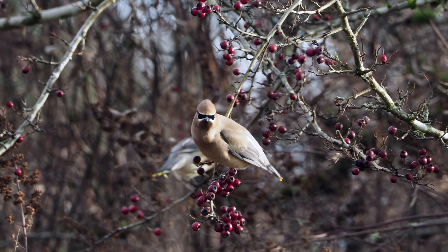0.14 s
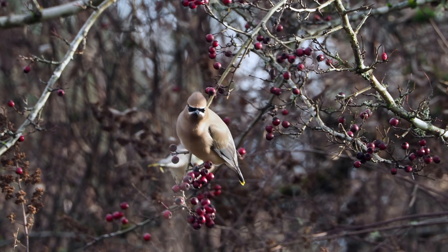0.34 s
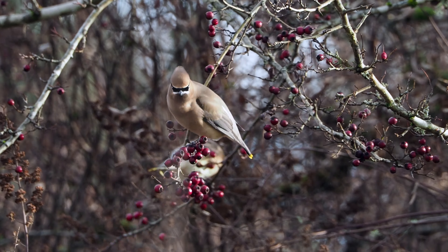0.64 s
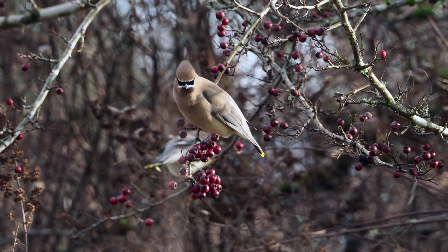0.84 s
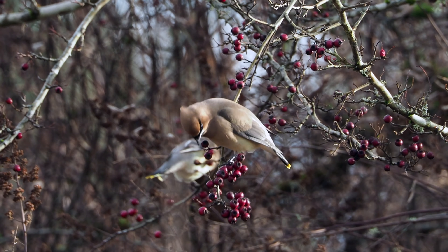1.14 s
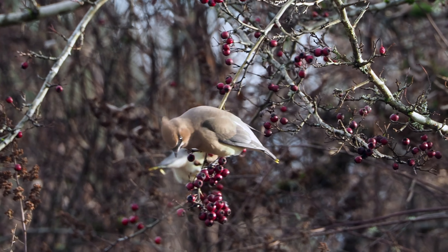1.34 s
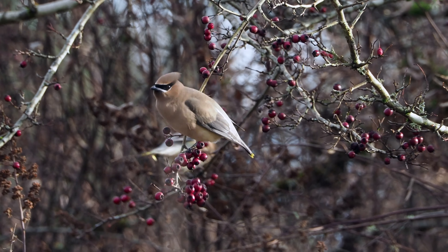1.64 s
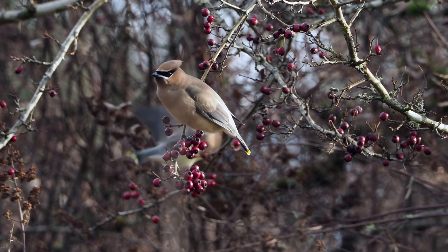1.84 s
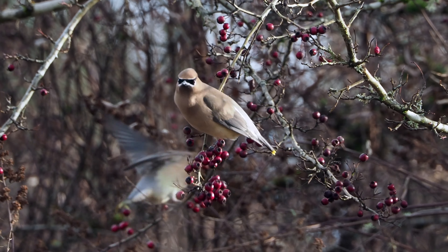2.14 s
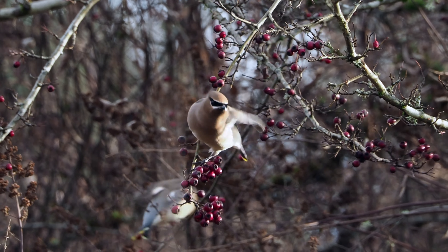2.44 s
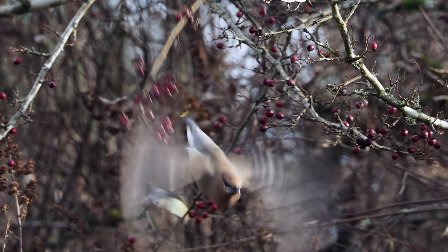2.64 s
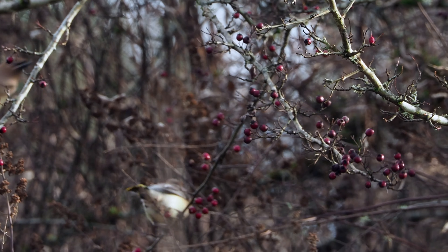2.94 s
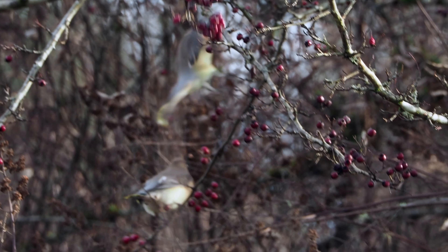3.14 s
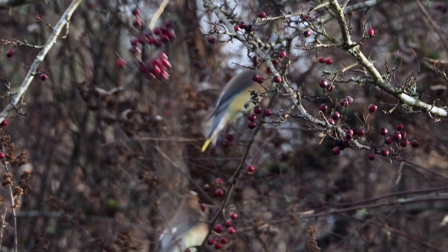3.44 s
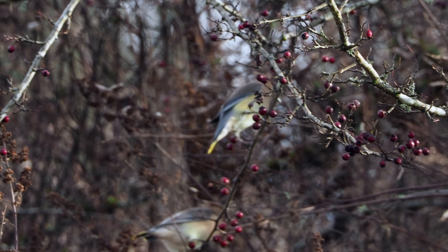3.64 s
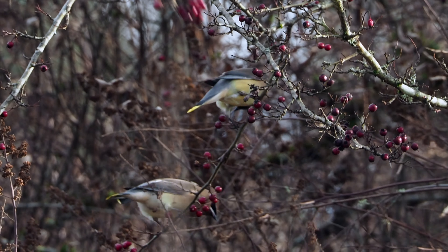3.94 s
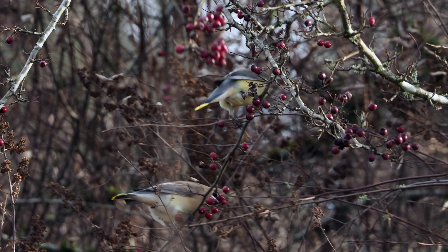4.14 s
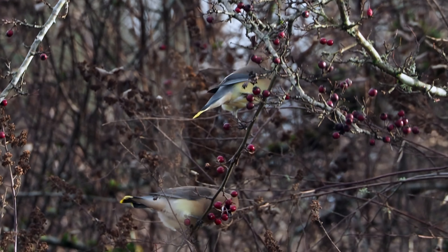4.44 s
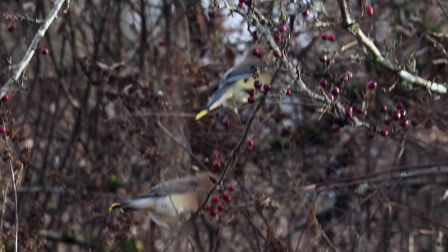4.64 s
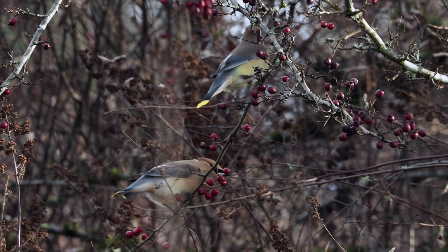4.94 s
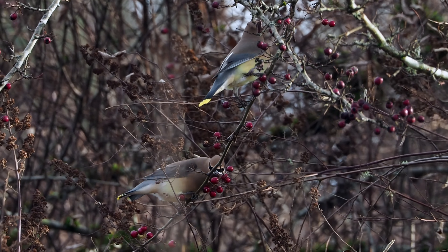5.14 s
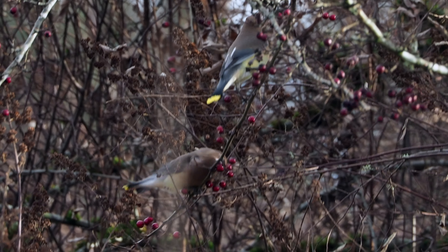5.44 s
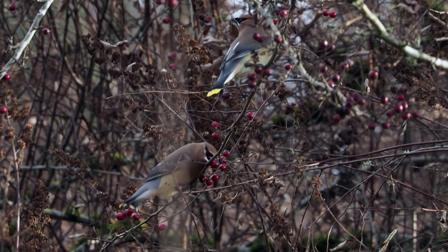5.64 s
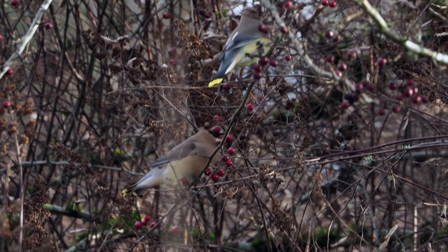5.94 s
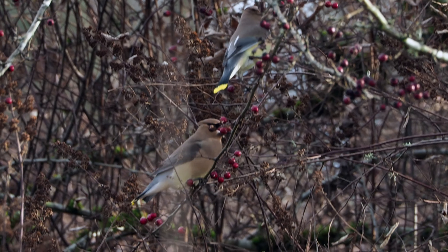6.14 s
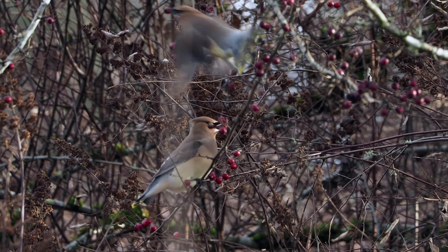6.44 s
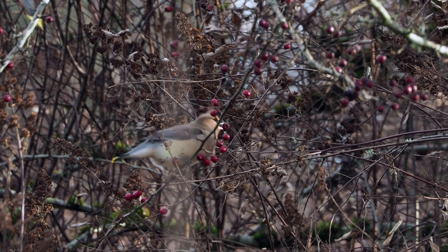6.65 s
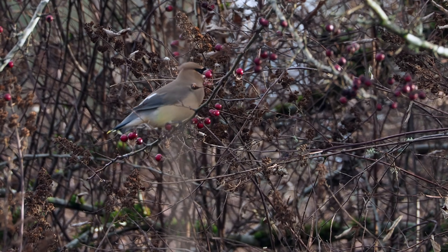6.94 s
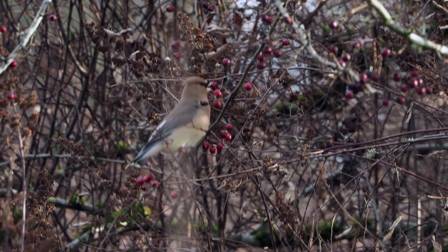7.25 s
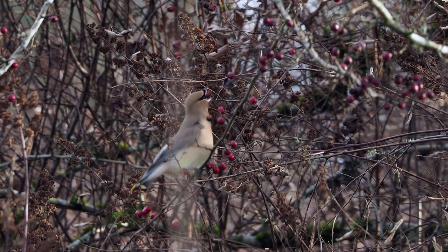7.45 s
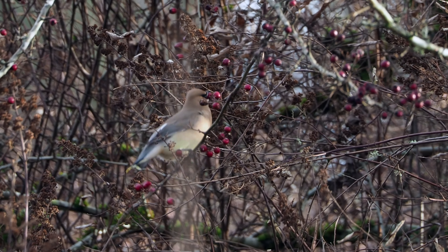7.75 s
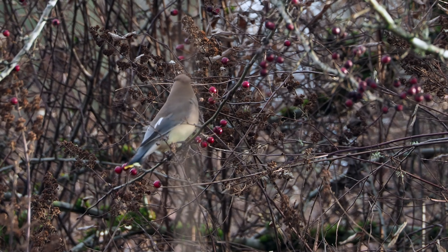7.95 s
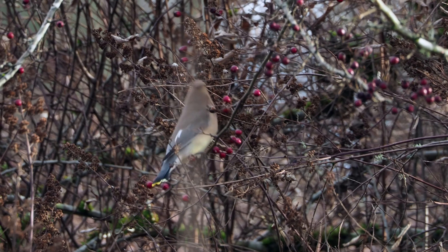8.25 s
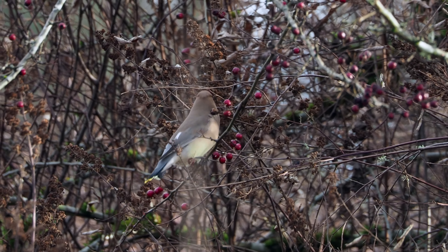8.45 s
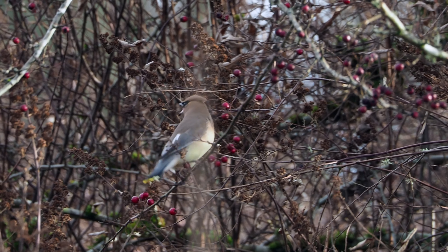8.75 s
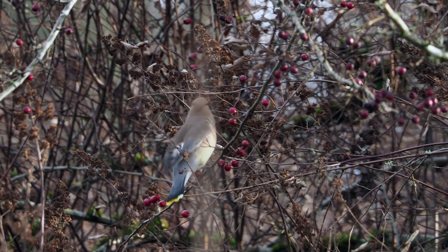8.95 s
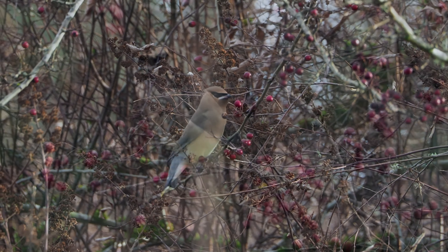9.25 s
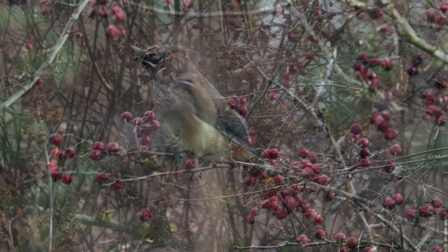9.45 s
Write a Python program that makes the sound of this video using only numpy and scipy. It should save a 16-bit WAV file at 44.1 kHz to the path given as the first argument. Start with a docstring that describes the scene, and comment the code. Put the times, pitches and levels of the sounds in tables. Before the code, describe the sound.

A flock of waxwings calls at the edge of a wood, over a steady low rumble and engine hum from distant traffic. From about 0.5 to 3.3 seconds, close, thin, very high whistles overlap, each swelling as it rises and then sagging. Farther birds warble in short slurs and twitter faintly, with a few held notes around 1.5 seconds. Between 3.5 and 5.7 seconds come four evenly spaced, high rasping calls, with tiny dry chips between them. From 5.5 to 8.2 seconds a more distant bird on the left gives four buzzy, plunging two-part calls. Harsh squeaks and three hoarse chirps cluster around 6.4 to 7.2 seconds. Twigs snap lightly near 3.3, 3.9 and 6.9 seconds. From 8.5 seconds, two more thin whistles join distant grating chirps and a faint rustle. The trees give the calls a short, soft echo.

```python
"""Waxwings in a berry tree at a wood's edge: thin arched whistles, then four rasping calls.
Each voice is a syrinx tone, nearly pure, bent in pitch; fast flutter makes it buzz. Another small bird
repeats a plunging two-part call, others squeak, chirp and warble, twigs snap, and trunks echo it all.
Distant traffic rumbles underneath as shaped noise and an engine hum."""
import sys
import numpy as np
from scipy import signal
from scipy.fft import rfft, irfft, next_fast_len
from scipy.io import wavfile
from scipy.ndimage import uniform_filter1d, map_coordinates

SR = 44100
rng = np.random.default_rng(int(sys.argv[2]) if len(sys.argv) > 2 else 0)


def inscribe(sig):
    """Save sig as 16-bit PCM at rate SR to the path in sys.argv[1].

    A 1-D sig is mono; a 2-D sig holds one channel per row.
    Samples are clipped to [-1, 1] before scaling.
    """
    pcm = np.round(np.clip(np.atleast_2d(sig).T, -1, 1) * 32767)
    wavfile.write(sys.argv[1], SR, pcm.astype(np.int16))


N = 423360
TIME = np.arange(N) / SR
SIDES = np.array([[.5], [-.5]])  # left, right share of a pan (left minus right)


def amp(db):
    """Decibels to gain."""
    return 10 ** (np.asarray(db) / 20)


def unit(x):
    """Scale to rms 1."""
    return x / np.sqrt(np.mean(x ** 2) + 1e-20)


def along(points, hz):
    """Interpolate (f/Hz, value) points on a log axis."""
    knots_hz, values = np.transpose(points)
    return np.interp(np.log(hz + 1), np.log(knots_hz + 1), values)


def wobble(t, rate_hz):
    """Smooth random curve with knots at rate_hz."""
    return map_coordinates(rng.standard_normal(1024), [t * rate_hz], mode="wrap")


def swells(rows):
    """Gain of bell-shaped swells."""
    return sum(amp(db) * np.exp(-((TIME - s) / width_s) ** 2) for s, width_s, db in rows)


def filtered(x, response):
    """Apply a frequency response."""
    size = next_fast_len(N + 8192)
    return irfft(rfft(x, size) * response(np.fft.rfftfreq(size, 1 / SR)), size)[..., :N]


def add(out, s, sound, pan_db):
    """Place a sound, louder and earlier on the nearer side."""
    lead_s = pan_db / 40000
    norm = np.sqrt((amp(pan_db) + amp(-pan_db)) / 2)
    for channel, side in enumerate((.5, -.5)):
        start = max(0, round((s + .0002 - side * lead_s) * SR))
        part = out[channel, start:start + len(sound)]
        part += (sound * amp(side * pan_db) / norm)[:len(part)]


def fade(t, rise_s, fall_s):
    """Soft note edges."""
    return np.sin(np.pi / 2 * np.clip(np.minimum(t / rise_s, (t[-1] - t) / fall_s), 0, 1)) ** 2


def syrinx(hz, octave_db):
    """Nearly pure tone with a weak octave."""
    phase = 2 * np.pi * np.cumsum(hz) / SR
    return np.sqrt(2) * (np.sin(phase) + amp(octave_db) * (hz < SR / 4) * np.sin(2 * phase))


def trill(t, rate_hz, uneven):
    """Phase of an uneven flutter, in cycles."""
    return np.cumsum(rate_hz * (1 + uneven * wobble(t, rate_hz / 2))) / SR


def notes(rows, quaver_hz, flutter_hz, depth_hz, pulsing, octave_db, rise, fall, haste=1):
    """Notes bent through three pitches (early if haste < 1); flutter shakes pitch and level together."""
    out = np.zeros((2, N))
    for s, length_s, first_hz, middle_hz, last_hz, db, pan_db in rows:
        t = np.arange(round(length_s * SR)) / SR
        u = (t / t[-1]) ** haste
        hz = first_hz + (last_hz - first_hz) * u + (2 * middle_hz - first_hz - last_hz) * 2 * u * (1 - u)
        flutter = np.sin(2 * np.pi * trill(t, flutter_hz, .111))
        tone = syrinx(hz + quaver_hz * wobble(t, 109.5) + depth_hz * flutter, octave_db)
        gain = amp(db + 1.77 * wobble(t, 61)) * (1 + pulsing * flutter)
        add(out, s, tone * gain * fade(t, rise * length_s, fall * length_s), pan_db)
    return out


def slurs(rows, halfway, pan_db):
    """Rows of sliding notes; halfway is the share of the slide done at mid-note."""
    return [(s, length_s, first_hz, first_hz + halfway * (last_hz - first_hz), last_hz, db, pan_db)
            for s, length_s, first_hz, last_hz, db in rows]


def arches(rows, foot, pan_db):
    """Rows of arched notes; both ends lie at foot times the top pitch."""
    return [(s, length_s, foot * hz, hz, foot * hz, db, pan_db) for s, length_s, hz, db in rows]


def rush(spectrum, lag_s=.0001):
    """Stereo noise of rms 1, arriving from the right."""
    likeness = [(60, 0.98), (130, 0.98), (290, 0.91), (640, 0.78), (1400, 0.98), (3100, 0.69), (7000, 0.03)]  # left-right coherence: f/Hz, correlation
    lean = [(60, -0.5), (200, -0.4), (400, -1.5), (700, -2), (1200, -6), (2400, -1), (4400, -2), (8000, -1),
            (15000, -3.5)]  # balance: f/Hz, pan/dB

    def colour(hz):
        turn = np.arccos(np.clip(along(likeness, hz), -1, 1)) / 2
        return amp(along(spectrum, hz)) * [np.cos(turn), np.sin(turn)]

    def direction(hz):
        return amp(SIDES * along(lean, hz)) * np.exp(-2j * np.pi * hz * lag_s * SIDES)

    mid, side = filtered(rng.standard_normal((2, N)), colour)
    return unit(filtered(np.array([mid + side, mid - side]), direction))


def patchy(x, depth_db):
    """Bands swell and fade independently as vehicles come and go."""
    spectra = signal.stft(x, nperseg=4096)[2]
    field = uniform_filter1d(rng.standard_normal(spectra.shape[1:]), size=3, axis=0)
    field = unit(uniform_filter1d(field, size=7, axis=1))
    return unit(signal.istft(spectra * amp(depth_db * field), nperseg=4096)[1][:, :N])


def among_trees(x, wet_db, perches=8):
    """Trunks scatter a diffuse echo, different from each perch."""
    decay = [(1500, 0.43), (3500, 0.73), (7000, 0.74), (14000, 0.37)]  # echo decay: f/Hz, t60/s
    out = np.zeros((2, N))
    position = np.arange(1, N + 1) / N * (perches - 1)
    for perch in range(perches):
        hz, t, noise = signal.stft(rng.standard_normal((2, SR * 3 // 4)), SR, nperseg=256)
        early = (1 + 3.4 * np.exp(-t / .014)) * (t > .004)
        tail = signal.istft(noise * amp(-60 * t / along(decay, hz)[:, None]) * early, SR, nperseg=256)[1]
        weight = np.clip(1 - np.abs(position - perch), 0, 1)
        heard = np.flatnonzero(weight)
        send = (x[:, heard] + x.mean(0)[heard] / 2) * np.sqrt(weight[heard])
        echo = signal.fftconvolve(send, tail / np.linalg.norm(tail[0]), axes=1)
        out[:, heard[0]:heard[0] + echo.shape[1]] += echo[:, :N - heard[0]]
    return x + amp(wet_db) * out


def air():
    """Faint steady hiss."""
    spectrum = [(1000, -8.5), (1700, -32), (1990, -6.5), (2820, 0.5), (4730, -12), (6200, -11.5),
                (7010, -6), (8380, -19), (10400, -15.5), (11200, -24.5), (13800, -15.5), (15100, -19.5),
                (16000, -35)]  # hiss: f/Hz, density/dB
    return amp(-59) * rush(spectrum)


def hum(shaft_hz=67.37):
    """A distant engine's first and third orders, drifting and fading."""
    phase = 2 * np.pi * np.cumsum(shaft_hz * (1 + .03484 * wobble(TIME, 5))) / SR
    first = amp(-46 + 2.55 * wobble(TIME, 6)) * np.sin(phase)
    third = amp(-52 + 5.25 * wobble(TIME, 5.8)) * np.sin(3 * phase + wobble(TIME, 14))
    return first + third


def traffic():
    """Far rumble, engines and tyres; now and then an engine pulls harder."""
    levels = [(0.0, -36, -41.5, -56.5), (0.5, -37.5, -43, -51.5), (1.2, -36, -42.5, -55),
              (4.52, -36.5, -41.5, -55), (5.8, -38, -47, -55.5), (9.28, -37.5, -47, -56),
              (9.5, -41, -52, -47)]  # road level: t/s, rumble/dB, engines/dB, tyres/dB
    surges = [(3.35, 0.16, -47.5), (4.5, 0.33, -54), (6.1, 0.19, -51), (8.7, 0.79, -55.5)]  # engine pulls: t/s, width/s, level/dB
    # noise spectra: f/Hz, density/dB
    rumble_spectrum = [(8.8, -66), (15, -8), (59, 2), (76, -1), (135, -10), (170, -14), (220, -31.5),
                       (370, -120)]
    engine_spectrum = [(94, -42), (160, -5), (216, 0), (310, -8), (385, -21.5), (480, -31), (620, -50),
                       (1060, -120)]
    tyre_spectrum = [(250, -20), (420, -4), (514, -5.5), (713, -1.5), (856, -7), (1010, -1), (1710, -15),
                     (2000, -23), (2600, -33), (4400, -120)]
    surge_spectrum = [(200, -28), (280, -11), (335, 2), (385, -14.5), (480, -35), (900, -120)]
    times_s, *columns = np.transpose(levels)
    rumble_db, engines_db, tyres_db = (np.interp(TIME, times_s, db) for db in columns)
    engines = amp(engines_db + .57) * patchy(rush(engine_spectrum), depth_db=2.5)
    engines += amp(engines_db - engines_db.mean()) * hum()
    rumble = amp(rumble_db - .08) * rush(rumble_spectrum)
    tyres = amp(tyres_db + 1.5) * patchy(rush(tyre_spectrum), depth_db=2)
    return rumble + engines + tyres + swells(surges) * rush(surge_spectrum)


def chatter(low_hz=2200, high_hz=3750, count=420):
    """Birds deep in the wood twitter in quick random slurs."""
    rows = []
    for when, length, pitch, bend, slope, side in rng.random((count, 6)):
        hz = low_hz * (high_hz / low_hz) ** pitch
        glide = .3 * (slope - .55)
        contour_hz = hz * (1 - glide), hz * (1 + .2 * (bend - .3)), hz * (1 + glide)
        rows.append((when * N / SR, .03 + .06 * length, *contour_hz, -66 - 4 * pitch, 9 * side - 7))
    return notes(rows, quaver_hz=80, flutter_hz=90, depth_hz=30,
                 pulsing=.2, octave_db=-30, rise=.4, fall=.4)


def thrush():
    """Long, steady far notes with a slight burr."""
    song = [(1.34, 0.42, 3250, 3255, -55), (1.34, 0.16, 3660, 3670, -56.5), (1.58, 0.16, 3376, 3190, -50),
            (1.68, 0.49, 3144, 3260, -52.5), (7.68, 0.194, 3360, 3296, -50), (7.84, .35, 3252, 3157, -53)]  # held notes: t/s, length/s, first/Hz, last/Hz, level/dB
    return notes(slurs(song, halfway=.6, pan_db=-4.5), quaver_hz=22.4, flutter_hz=143.4, depth_hz=77,
                 pulsing=.1, octave_db=-20, rise=.12, fall=.26)


def grates():
    """Far arched chirps, grating with fast flutter."""
    calls = [(8.55, .075, 2970, -51.5), (8.7, .13, 3010, -57.5), (9.05, 0.093, 3120, -51),
             (9.21, .093, 3230, -48), (9.39, 0.094, 3294, -46)]  # chirps: t/s, length/s, top/Hz, level/dB
    return notes(arches(calls, foot=.56, pan_db=-1.5), quaver_hz=80, flutter_hz=212.7, depth_hz=150,
                 pulsing=.15, octave_db=-17, rise=.17, fall=.24)


def plunging_calls(arch_hz=310, plunge_s=.12, plunge_hz=(9500, 6790, 5520), buzz_hz=(9060, 7460), pan_db=7):
    """A high lead-in breaks into a buzzy plunge; a second buzz then falls and levels out."""
    # two-part calls: plunge t/s, lead length/s, lead top/Hz, lead/dB, plunge/dB,
    # buzz delay/s, buzz length/s, buzz end/Hz, buzz/dB
    calls = [(5.509, 0.16, 9470, -56, -49, 0.19, 0.12, 7000, -45),
             (6.276, 0.057, 8980, -51, -46.5, .13, .17, 6920, -44.5),
             (6.974, .06, 8960, -51.5, -43, 0.13, 0.17, 6880, -44),
             (7.834, 0.19, 9550, -61, -46, 0.15, .17, 6060, -48)]
    leads, plunges, buzzes = [], [], []
    for s, lead_s, hz, lead_db, plunge_db, delay_s, buzz_s, end_hz, buzz_db in calls:
        leads.append((s - lead_s, lead_s, hz - arch_hz, hz, hz - arch_hz, lead_db, pan_db))
        plunges.append((s, plunge_s, *plunge_hz, plunge_db, pan_db))
        buzzes.append((s + delay_s, buzz_s, *buzz_hz, end_hz, buzz_db, pan_db))
    return (notes(leads, quaver_hz=90, flutter_hz=168, depth_hz=110,
                  pulsing=.15, octave_db=-40, rise=.079, fall=.064)
            + notes(plunges, quaver_hz=150, flutter_hz=157, depth_hz=400,
                    pulsing=.41, octave_db=-35, rise=.099, fall=1, haste=.5)
            + notes(buzzes, quaver_hz=111, flutter_hz=150.3, depth_hz=316,
                    pulsing=.25, octave_db=-34.5, rise=.32, fall=.27, haste=.65))


def warble():
    """Robin-like slurs that level out."""
    song = [(0, .057, 4050, 3390, -57), (.05, 0.1, 2700, 2550, -57), (.15, 0.059, 3050, 2740, -47.5),
            (.68, 0.049, 3400, 2970, -52.5), (.8, 0.049, 3100, 3200, -48.5), (.9, 0.12, 3300, 2520, -52),
            (1.17, .062, 3290, 3080, -48), (1.5, 0.077, 2250, 2750, -52), (1.6, 0.19, 2560, 2244, -51),
            (2.305, 0.087, 3040, 2610, -50.5), (2.42, 0.1, 2370, 2176, -59), (3.09, 0.048, 2445, 2850, -53),
            (3.14, 0.096, 2600, 2100, -56.5), (3.29, 0.061, 2485, 3003, -47),
            (3.7, .081, 2250, 2510, -48.5), (3.765, 0.056, 2520, 2850, -40.5),
            (3.83, .064, 2440, 2286, -49.5), (3.96, .043, 3050, 2400, -49), (4.42, 0.038, 2650, 2720, -50),
            (4.47, .066, 2750, 3320, -46), (5.67, 0.082, 3400, 3370, -57), (5.96, 0.07, 2800, 2620, -51),
            (6.04, 0.095, 2170, 2234, -57.5), (6.54, .15, 2680, 2204, -55), (8.22, .12, 1980, 1944, -58)]  # slurs: t/s, length/s, first/Hz, last/Hz, level/dB
    return notes(slurs(song, halfway=.72, pan_db=-3), quaver_hz=19, flutter_hz=82, depth_hz=13,
                 pulsing=.072, octave_db=-25, rise=.11, fall=.15)


def chips(length_s=.028, contour_hz=(2500, 3100, 2600)):
    """Dry scolding: tiny arches roughened by flutter."""
    calls = [(3.407, -45), (4.02, -46.5), (4.624, -46), (5.222, -45.5)]  # chips: t/s, level/dB
    rows = [(s - .003, length_s, *contour_hz, db, 0) for s, db in calls]
    return notes(rows, quaver_hz=206, flutter_hz=300, depth_hz=360,
                 pulsing=.051, octave_db=-25, rise=.22, fall=.54)


def flock(halfway=.22):
    """Further waxwings hold a pitch, then droop."""
    calls = [(0, .2, 6620, 30, -70, 4), (0.244, 0.37, 6900, 129, -58.5, 6),
             (0.297, 0.36, 9150, 600, -66, 8), (0.973, 0.36, 7230, 347, -54, -2),
             (2.387, 0.24, 9060, 400, -64, 4.5), (2.621, .29, 9180, 600, -57.5, 3),
             (2.713, 0.25, 7000, 30, -54, 6.5), (3.593, 0.18, 7250, 100, -43, -8),
             (3.607, .3, 8380, 300, -54, 4), (3.908, 0.078, 8020, 400, -46.5, 3),
             (4.488, 0.33, 9320, 1610, -55.5, 7.5), (5.017, 0.018, 7250, 200, -39, -1.5),
             (5.999, 0.23, 6600, 30, -69, 2.5)]  # whistles: t/s, length/s, first/Hz, droop/Hz, level/dB, pan/dB
    rows = [(s, length_s, hz, hz - halfway * droop_hz, hz - droop_hz, db, pan_db)
            for s, length_s, hz, droop_hz, db, pan_db in calls]
    return notes(rows, quaver_hz=55, flutter_hz=163.8, depth_hz=75,
                 pulsing=.12, octave_db=-40, rise=.12, fall=.054)


def twigs():
    """Twigs and berry stalks snap in bright noise bursts."""
    snaps = [(3.3254, -41, 0.0059, 0.5), (3.8555, -42, .008, -2.5), (6.5717, -42, 0.04, -12),
             (6.578, -53, .025, -4), (6.853, -37.5, 0.016, -3.5), (7.449, -52, 0.018, 4.5)]  # cracks: t/s, level/dB, t60/s, pan/dB
    colour = [(500, -22), (1800, -1), (3200, 10.5), (8000, 4.5), (15000, -2)]  # f/Hz, gain/dB
    out = np.zeros((2, N))
    t = np.arange(SR // 10) / SR
    for s, db, t60_s, pan_db in snaps:
        add(out, s, rng.standard_normal(len(t)) * amp(db - 60 * t / t60_s), pan_db)
    return filtered(out, lambda hz: amp(along(colour, hz)))


def chirps(lower_db=-13):
    """Hoarse chirps with a second voice a fifth below."""
    calls = [(6.775, .055, 2680, -47.5), (6.938, .042, 2990, -49), (7.112, .0346, 2870, -47)]  # upper voice: t/s, length/s, top/Hz, level/dB
    upper_rows = np.array(arches(calls, foot=.7, pan_db=-2))
    lower_rows = upper_rows.copy()
    lower_rows[:, 2:5] *= 2 / 3
    upper, lower = (notes(rows, quaver_hz=41.2, flutter_hz=97, depth_hz=30, pulsing=.34,
                          octave_db=-31, rise=.23, fall=.11) for rows in (upper_rows, lower_rows))
    return upper + amp(lower_db) * lower


def squeaks(pan_db=-7):
    """Harsh squeaks swell as they climb, then dive faster."""
    calls = [(6.425, .07, .08, 0.052, -48.5), (6.719, .085, 0, 0.029, -43)]  # swoops: t/s, climb/s, pause/s, dive/s, level/dB
    contour_hz = (3560, 5500, 6600, 2900)  # swoop pitch: foot/Hz, middle/Hz, top/Hz, end/Hz
    foot_hz, middle_hz, top_hz, end_hz = contour_hz
    climbs, dives = [], []
    for s, climb_s, pause_s, dive_s, db in calls:
        climbs.append((s, climb_s, foot_hz, middle_hz, top_hz, db, pan_db))
        dives.append((s + climb_s + pause_s, dive_s, top_hz, middle_hz, end_hz, db + 1, pan_db))
    return (notes(climbs, quaver_hz=120, flutter_hz=262, depth_hz=220,
                  pulsing=.64, octave_db=-26, rise=.45, fall=.079)
            + notes(dives, quaver_hz=173, flutter_hz=263, depth_hz=260,
                    pulsing=.5, octave_db=-25, rise=.083, fall=.43))


def scratch(voice, under_db=-16.5):
    """Gritty hiss flickers under a voice and in two short rustles."""
    rustles = [(9.115, 0.059, -53), (9.27, 0.067, -56.5)]  # hiss swells: t/s, width/s, level/dB
    spectrum = [(3000, -47), (4400, -6.5), (5800, 0.5), (7200, 3), (8500, -12), (11000, -20), (15000, -34)]  # hiss: f/Hz, density/dB
    voice_rms = np.sqrt(np.abs(uniform_filter1d(voice.mean(0) ** 2, size=400)))
    rustle = unit(rush(spectrum) * amp(2 * wobble(TIME, 70)))
    grit = unit(rush(spectrum) * amp(6 * wobble(TIME, 70)))
    return swells(rustles) * rustle + amp(under_db) * voice_rms * grit


def rasps(buzz_hz=340, stutter_hz=700, scratch_hz=165, swell_db=12, attack_s=.12):
    """Each call slides up clean, buzzes, sags, then stutters in uneven downward scoops."""
    calls = [(3.459, .42, 6730, -45.5), (4.069, .44, 6800, -42.5), (4.679, .41, 6840, -43),
             (5.281, .39, 6874, -43.5)]  # rasps: t/s, length/s, f/Hz, level/dB
    shadow = [(7500, .0053), (13000, -6)]  # overtone weaker on the left: f/Hz, pan/dB
    out = np.zeros((2, N))
    for s, length_s, hz, db in calls:
        t = np.arange(round(length_s * SR)) / SR
        progress = t / t[-1]
        buzz = np.exp(-((progress - .3) / .11) ** 2)
        sag = np.exp(-((progress - .53) / .11) ** 2)
        strain = np.clip((progress - .3) / .35, 0, 1)
        scoop_cycles = trill(t, 46, .3) + .15 * wobble(t, 110)
        scoop = (1 - np.abs(np.sin(np.pi * scoop_cycles))) ** 2
        hz = hz - 700 * np.exp(-t / .035) + 250 * (1 - strain) + 50 * buzz - 260 * sag
        hz += 30 * wobble(t, 90)
        hz += buzz_hz * buzz * np.sin(2 * np.pi * trill(t, 290, .173))
        hz += strain * (stutter_hz * (scoop.mean() - scoop) + scratch_hz * wobble(t, 600))
        db = db - swell_db * np.clip(1 - t / attack_s, 0, 1) - 2 * sag
        db += (1 + strain) * wobble(t, 138)
        add(out, s, syrinx(hz, -21 + 2 * strain) * amp(db) * fade(t, .008, .008), pan_db=-2)
    return filtered(out, lambda hz: amp(SIDES * along(shadow, hz)))


def whistles(climb_hz=1000, swell_db=8.5, swell_share=.47, flick_hz=1500, flick_s=.0068):
    """Close waxwing whistles swell as they climb, then sag; pitch flicks down as the syrinx lets go."""
    calls = [(0.447, 0.26, .2, 8130, 48, -58, 8.5), (0.507, 0.39, 0.28, 8390, 350, -45.5, 1),
             (1.219, 0.37, .17, 8230, 300, -46, 0.9), (1.283, 0.36, 0.23, 8360, 200, -51, 6),
             (1.891, 0.41, 0.26, 8210, 549, -47.5, 1), (1.961, 0.27, .16, 7980, 100, -50, 7.5),
             (2.606, 0.31, 0.23, 8150, 0, -46.5, 4.5), (2.627, 0.29, .19, 6860, 101, -54.5, 2),
             (3.059, .255, .15, 7950, -6, -44, 5), (8.631, 0.26, 0.19, 7950, 497.5, -49.5, 11),
             (9.378, 0.21, 0.22, 7680, 2.5, -54, 7)]  # arches: t/s, length/s, climb/s, top/Hz, sag/Hz, level/dB, pan/dB
    out = np.zeros((2, N))
    for s, length_s, climb_s, top_hz, sag_hz, db, pan_db in calls:
        t = np.arange(round(length_s * SR)) / SR
        rising_hz = top_hz - climb_hz * (1 - t / climb_s) ** 2
        sagging_hz = top_hz - sag_hz * ((t - climb_s) / (length_s - climb_s)) ** 2
        hz = np.where(t < climb_s, rising_hz, sagging_hz)
        hz += 50 * wobble(t, 20) + 60 * wobble(t, 59.8) + 42 * wobble(t, 400)
        hz -= flick_hz * np.exp((t - t[-1]) / flick_s)
        db = db - swell_db * np.clip(1 - t / (swell_share * length_s), 0, 1)
        db += 1.2 * wobble(t, 91.2)
        add(out, s, syrinx(hz, -34) * amp(db) * fade(t, .0052, .0068), pan_db)
    return out


def scene():
    """The further the bird, the more of its sound is echo."""
    song, grating, scolding, close = warble(), grates(), chips(), whistles()
    near = close + scratch(close) + rasps() + twigs() + chirps() + amp(-5.5) * squeaks()
    wood = among_trees(near, wet_db=-7.5)
    middle = amp(-1.5) * flock() + amp(-2.5) * song + amp(-1) * scolding
    wood += among_trees(middle, wet_db=-6)
    far = amp(-4) * plunging_calls() + amp(-1) * thrush() + amp(-4.5) * grating + chatter()
    wood += among_trees(far, wet_db=-2.5)
    return wood + traffic() + air()


def record(dry, top_hz=15750):
    """Brick-wall low-pass."""
    return filtered(dry, lambda hz: hz < top_hz)


dry = scene()
out = record(dry)
inscribe(out)
```